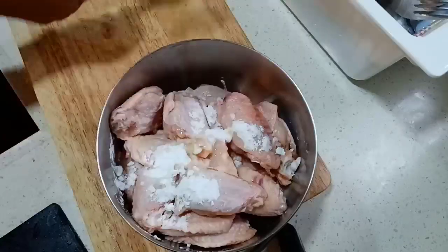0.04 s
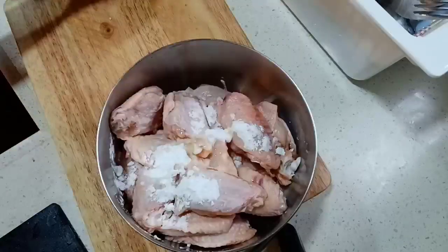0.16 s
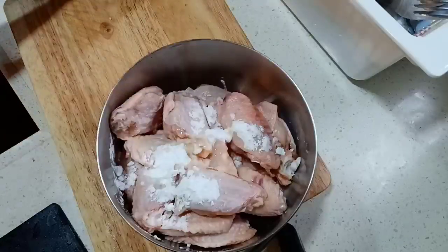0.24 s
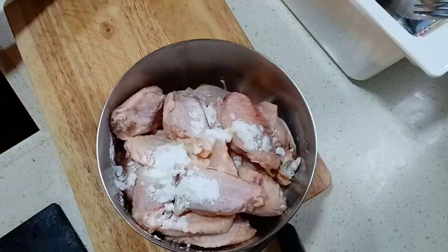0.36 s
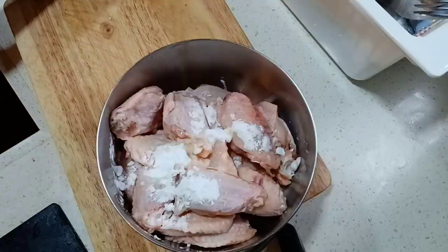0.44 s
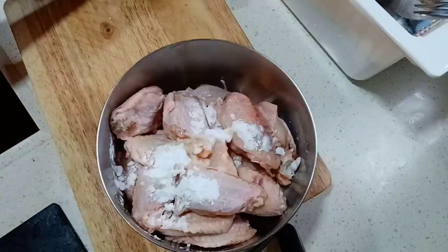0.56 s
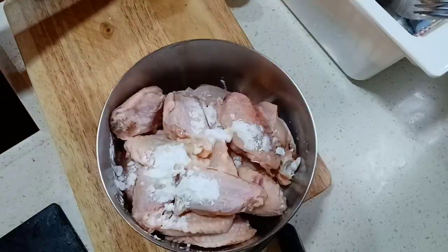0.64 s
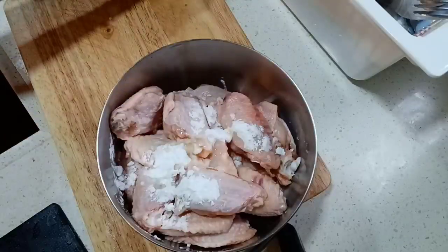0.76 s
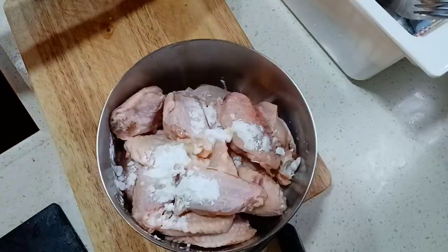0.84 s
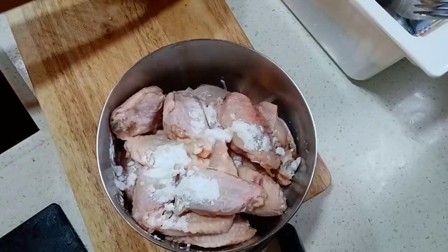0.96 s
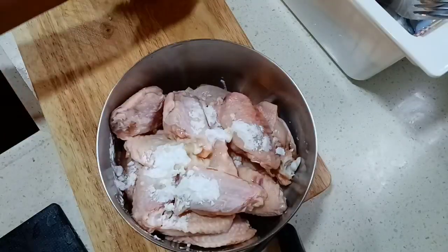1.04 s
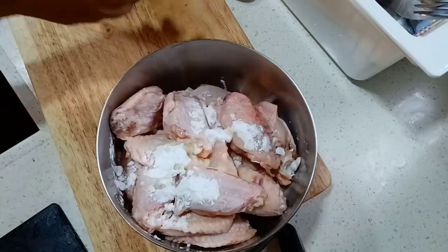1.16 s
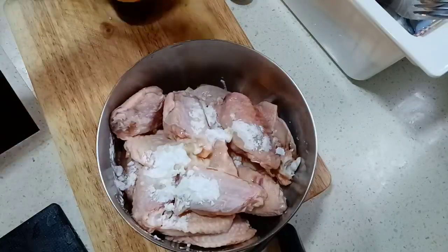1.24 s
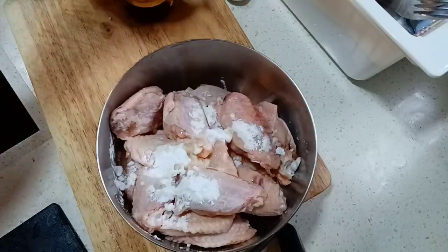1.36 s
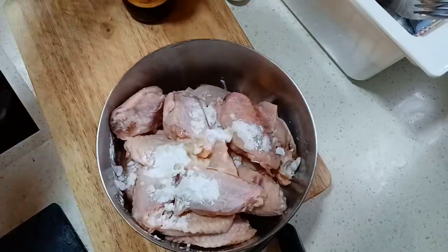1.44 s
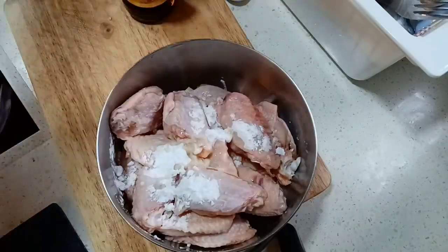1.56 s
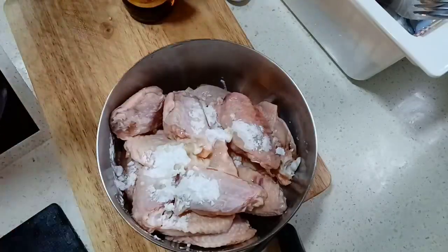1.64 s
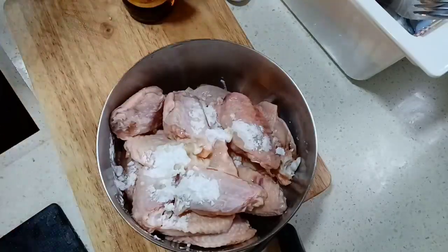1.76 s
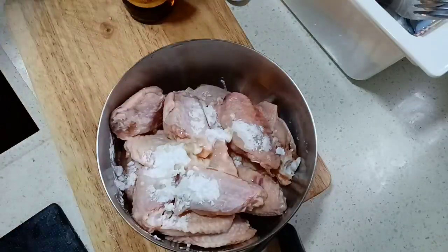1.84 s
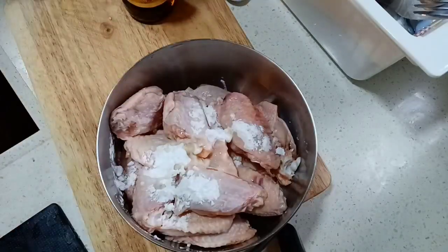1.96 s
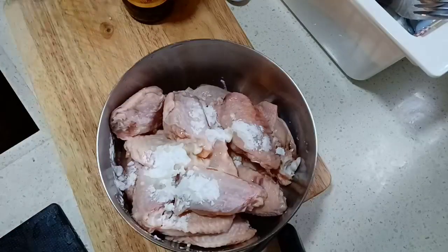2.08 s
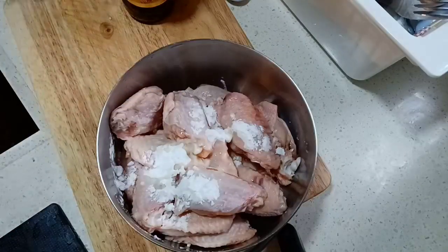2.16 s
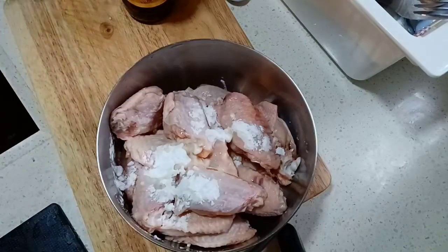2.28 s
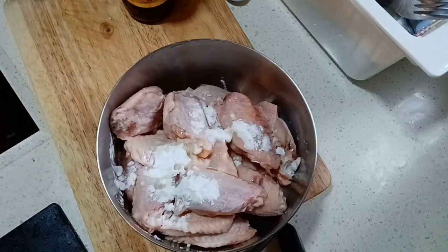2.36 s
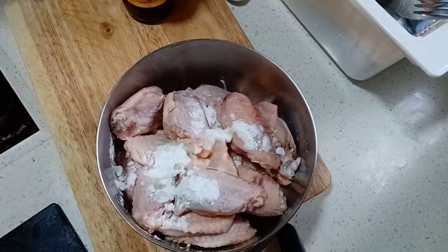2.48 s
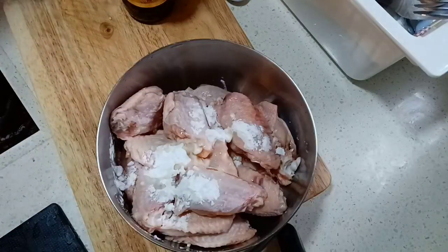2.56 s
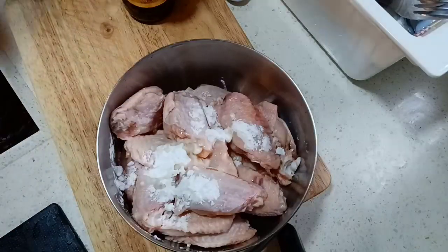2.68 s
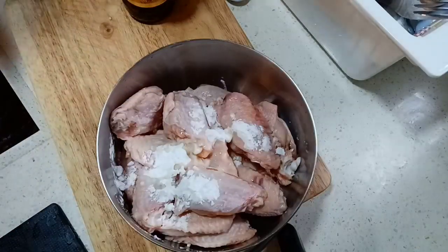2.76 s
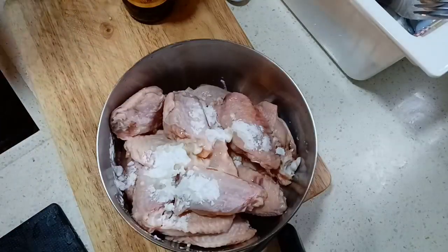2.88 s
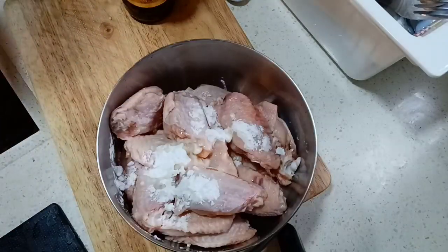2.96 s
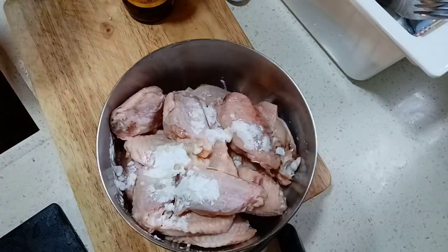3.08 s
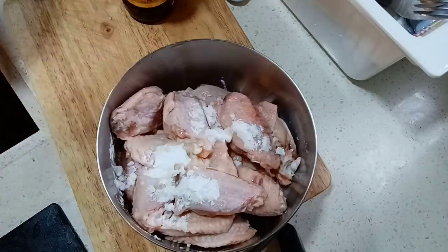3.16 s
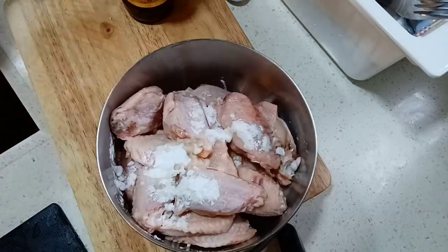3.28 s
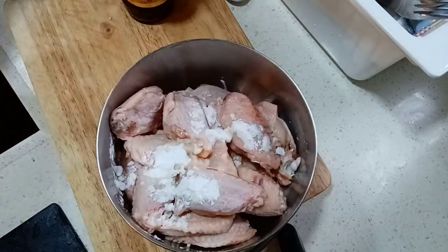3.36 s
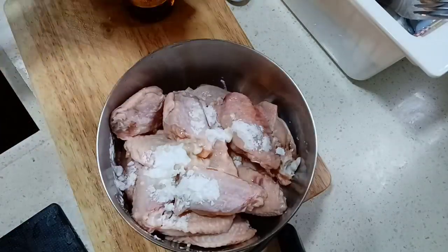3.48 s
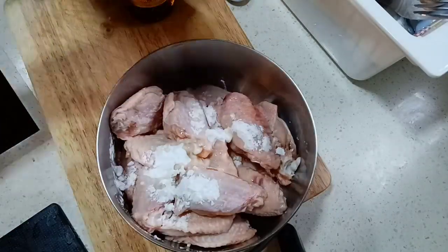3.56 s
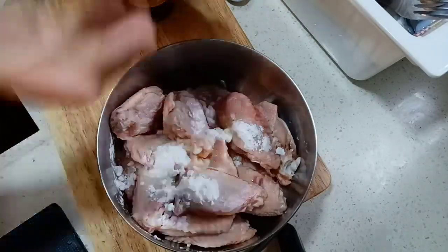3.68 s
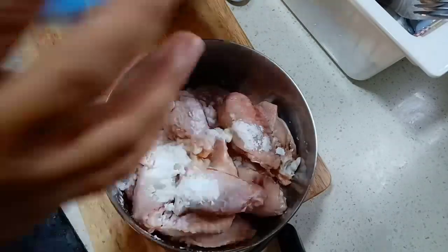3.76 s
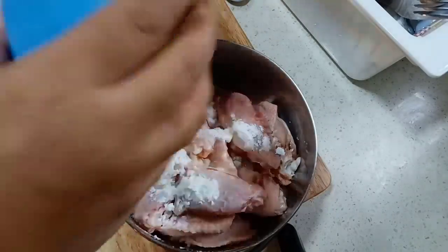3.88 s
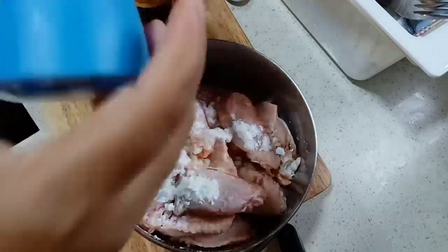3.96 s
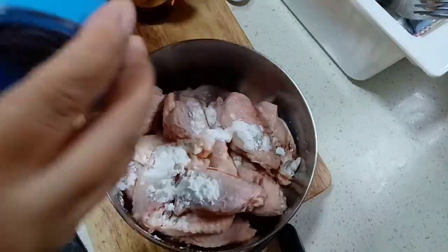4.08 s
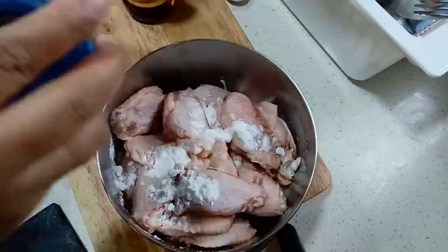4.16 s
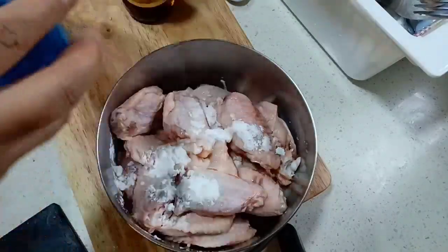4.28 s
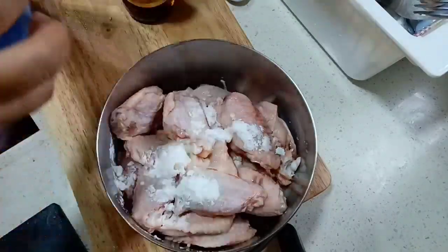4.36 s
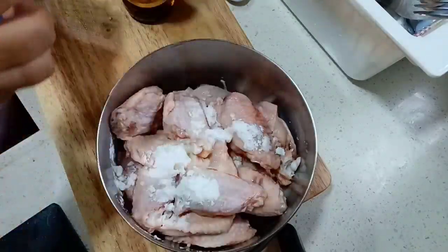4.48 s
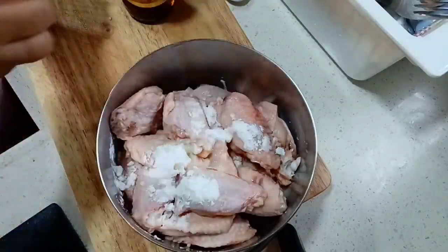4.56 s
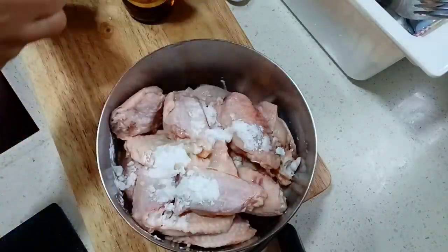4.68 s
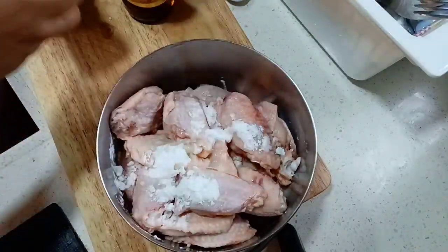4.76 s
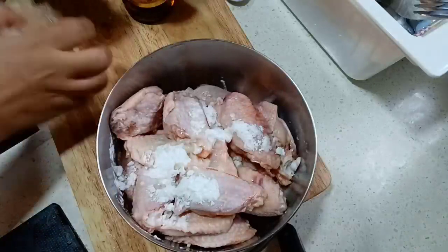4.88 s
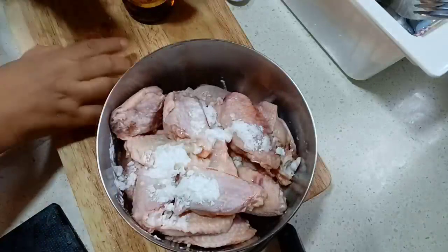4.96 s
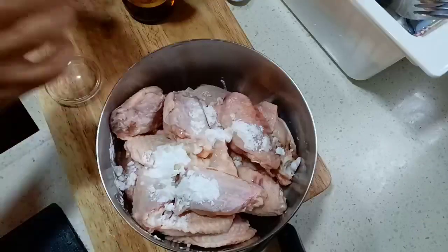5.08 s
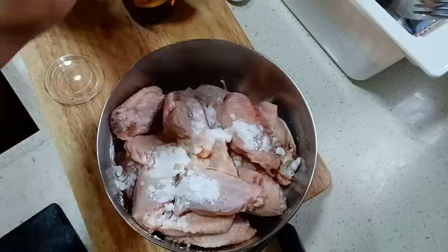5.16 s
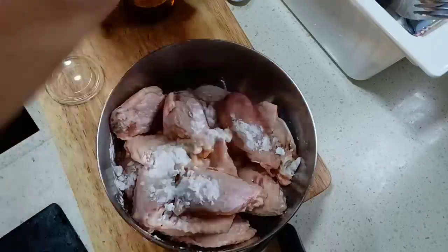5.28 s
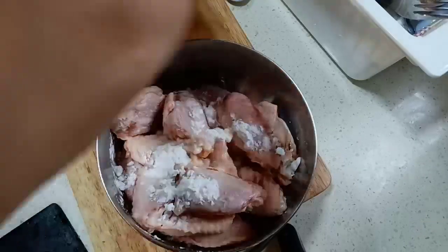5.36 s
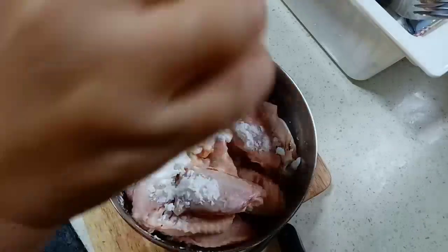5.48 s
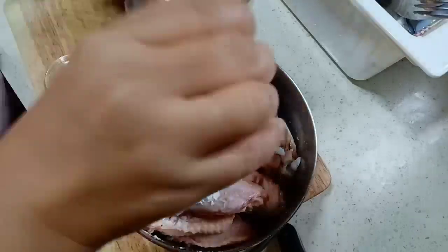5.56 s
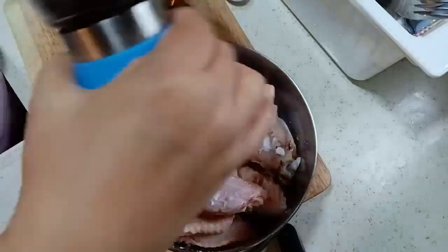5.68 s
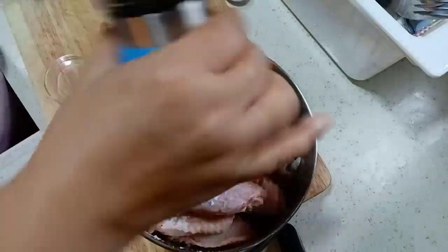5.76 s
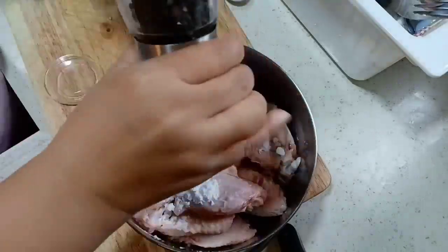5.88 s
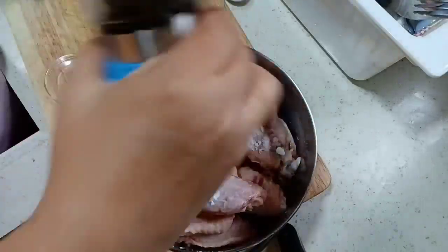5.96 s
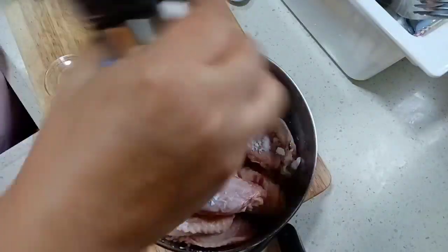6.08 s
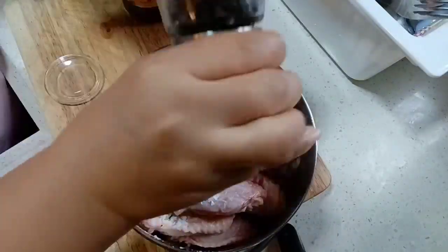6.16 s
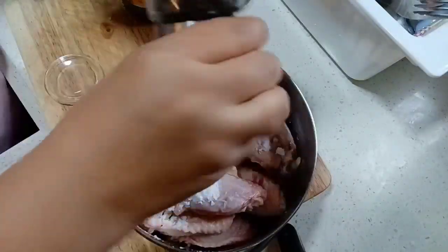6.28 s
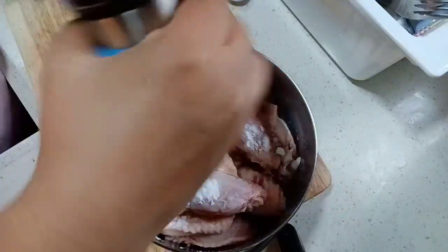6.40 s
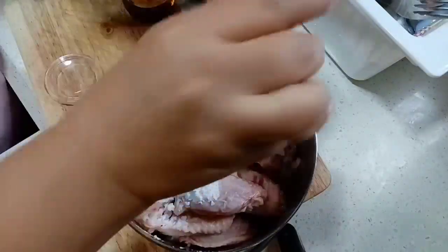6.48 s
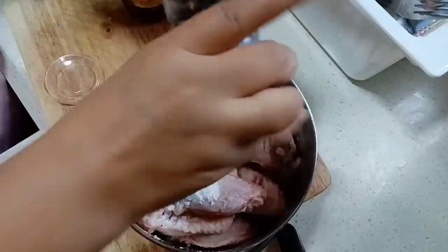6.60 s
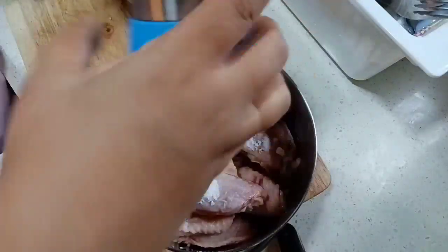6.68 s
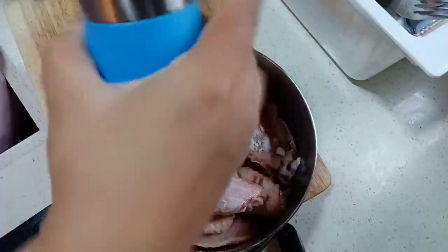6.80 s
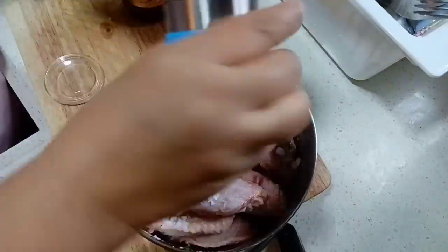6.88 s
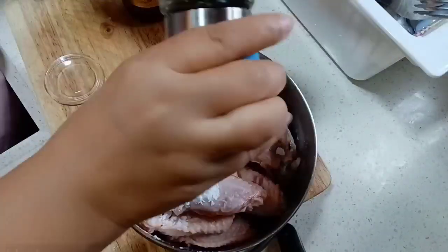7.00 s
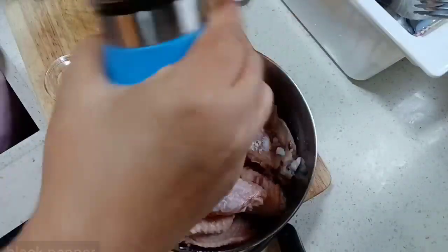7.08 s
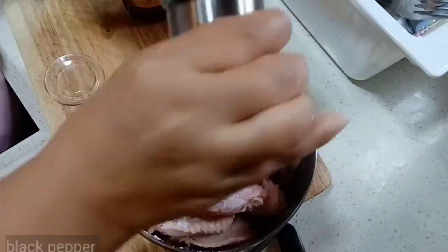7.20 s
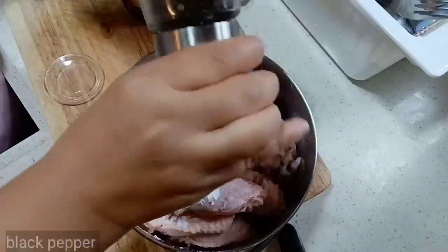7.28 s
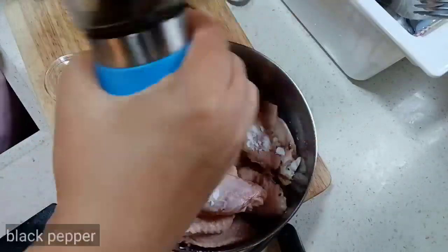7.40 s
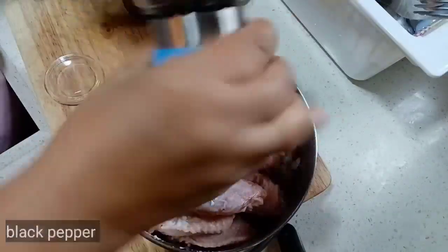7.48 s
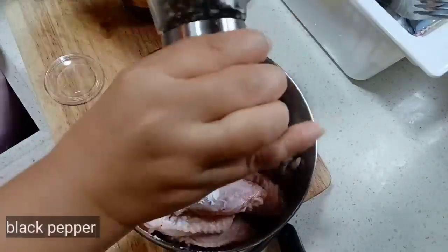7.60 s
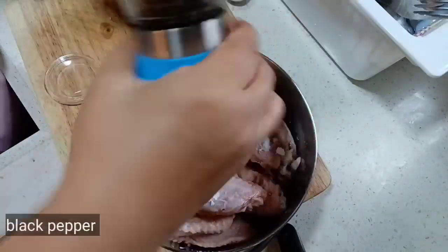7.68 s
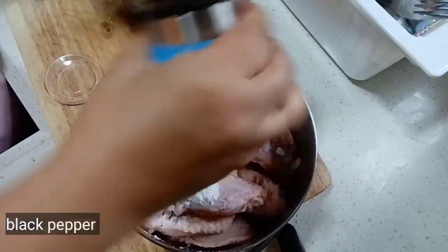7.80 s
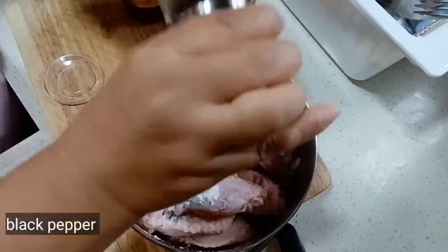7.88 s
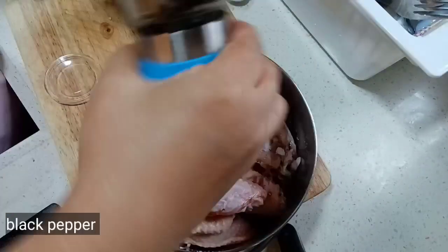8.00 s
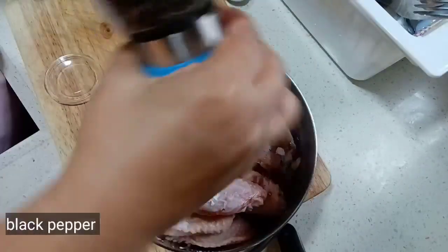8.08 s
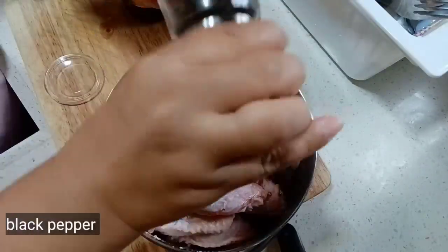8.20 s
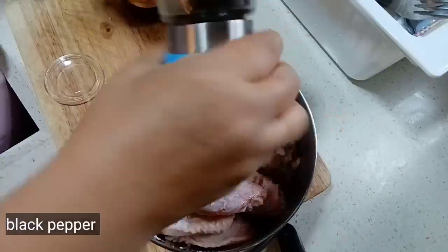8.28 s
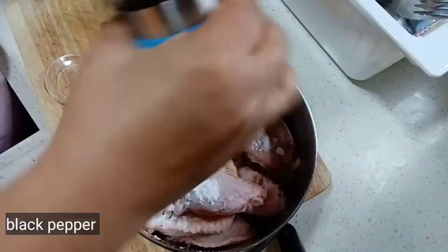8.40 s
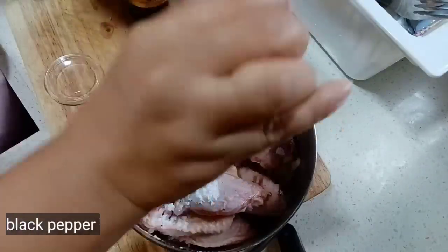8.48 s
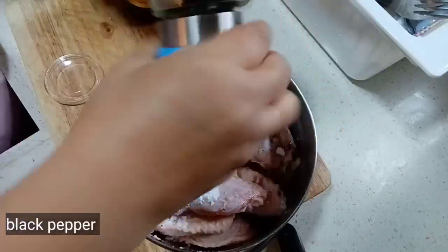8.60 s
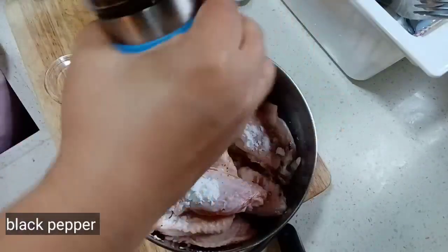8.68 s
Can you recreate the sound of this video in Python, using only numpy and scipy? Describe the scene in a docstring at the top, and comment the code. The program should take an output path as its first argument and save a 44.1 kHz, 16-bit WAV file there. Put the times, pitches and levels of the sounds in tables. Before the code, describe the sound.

Jars knock on a wooden board and steel utensils clink, then a pepper mill rasps and crunches over a low fan hum.

```python
"""A pepper mill twisted to and fro, close to a stereo microphone in a small kitchen with a fan humming.
Its collar sticks and slips in a rasp while peppercorns crunch and crack in the burr.
Before the grinding, as meat is seasoned in a steel bowl, jars knock and slide on a wooden board,
steel utensils clink, and a hand picks up the mill and drops its plastic cap."""
import sys
import numpy as np
from scipy import signal
from scipy.fft import rfft, irfft
from scipy.io import wavfile
from scipy.ndimage import map_coordinates

SR = 44100
rng = np.random.default_rng(int(sys.argv[2]) if len(sys.argv) > 2 else 0)


def pcm_store(signal):
    """Save signal as 16-bit PCM."""
    levels = np.round(np.clip(np.atleast_2d(signal), -1, 1) * 32767)
    wavfile.write(sys.argv[1], SR, levels.astype(np.int16).T)


N = 385434
TIME = np.arange(N) / SR


def from_db(db):
    return 10 ** (np.asarray(db) / 20)


def unit_rms(x):
    return x / np.sqrt(np.mean(x ** 2) + 1e-20)


def at_hz(points, hz):
    """A table read on a log-frequency axis."""
    return np.interp(np.log(hz + 1e-9), np.log(np.array(points)[:, 0]), np.array(points)[:, 1])


def drift(per_s):
    """A random curve through 2048 points of spread 1; it holds after the last."""
    steps = rng.standard_normal(2048)
    return np.interp(TIME * per_s, np.arange(len(steps)), steps)


def through(x, response):
    """Causal convolution, cut to the length of x."""
    return signal.oaconvolve(np.atleast_2d(x), np.atleast_2d(response), axes=1)[:, :x.shape[-1]]


def body(spectrum, size=4096):
    """Minimum-phase impulse response with this spectrum; unit energy."""
    gains = from_db(at_hz(spectrum, np.fft.rfftfreq(size, 1 / SR)))
    cepstrum = irfft(np.log(gains))
    cepstrum[1:size // 2] *= 2
    cepstrum[size // 2 + 1:] = 0
    response = irfft(np.exp(rfft(cepstrum)))
    return response / np.linalg.norm(response)


def add(track, start_s, sound):
    start = int(start_s * SR)
    track[start:start + len(sound)] += sound[:N - start]


def contacts(times, levels_db, spectrum, t60, snap_db, size=8192):
    """Each contact is a snap and a crowd of close, fast-dying vibrations, coloured by the body."""
    out, response = np.zeros(N), body(spectrum)
    fade = from_db(-60 * TIME[:size] / t60)
    weight = np.linalg.norm(fade)
    snap = from_db(snap_db) * weight * signal.unit_impulse(size)
    for start_s, db in zip(times, levels_db):
        burst = through(rng.standard_normal(size) * fade + snap, response)[0]
        add(out, start_s, from_db(db) * burst * weight / np.linalg.norm(burst))
    return out


def ringing(times, levels_db, modes, scatter_db, detune, rise_s=0.0008, size=22050):
    """Every blow excites the modes with strengths of its own; the grip shifts them a little."""
    out, t = np.zeros(N), TIME[:size]
    hz, mode_db, t60 = np.transpose(modes)[:, :, None]
    attack = 1 - np.exp(-t / rise_s)   # a soft, heavy contact takes time to push
    envelope = attack * from_db(-60 * t / t60)
    for start_s, db in zip(times, levels_db):
        strength, shift, side = rng.standard_normal((3, len(modes), 1))
        gains = from_db(mode_db + scatter_db * strength) * np.sign(side)
        waves = np.sin(2 * np.pi * hz * (1 + detune * shift) * t) * envelope
        add(out, start_s, from_db(db) * (gains * waves).sum(0) / np.linalg.norm(gains))
    return out


def grains(per_s, spread_db, spectrum):
    """A stream of tiny random impacts of uneven size; rms 1."""
    sizes = from_db(spread_db * np.minimum(rng.exponential(1, N), 4)) * rng.choice([-1, 1], N)
    impacts = sizes * (rng.random(N) < per_s / SR)
    return unit_rms(through(impacts, body(spectrum))[0])


def swells(times, levels_db, lengths):
    """Each stroke speeds up and slows down again: a bell of friction power."""
    t = TIME[::40]
    power = sum(from_db(db) ** 2 * np.exp(-(2 * (t - middle_s) / length_s) ** 2)
                for middle_s, db, length_s in np.broadcast(times, levels_db, lengths))
    return np.interp(TIME, t, np.sqrt(power))


def wandering(x, depth_s=0.0028, per_s=5.1):
    """The changing grip bends every resonance up and down by a few per cent."""
    bent = TIME + depth_s * drift(per_s)
    return map_coordinates(x, [bent * SR], order=5, mode="mirror")


def dulled(x, top_hz):
    """A softer contact excites nothing far above this pitch."""
    lowpass = signal.butter(4, min(top_hz, .45 * SR), fs=SR, output="sos")
    return signal.sosfilt(lowpass, x + 1e-18)


# The small kitchen's decay: band_hz, t60_s
ROOM_DECAY = [(100, 0.15), (300, 0.28), (1000, 0.16), (3000, 0.18), (8000, 0.195), (15000, 0.077)]

def kitchen_tail(build_s=0.0043, near_db=13.5, near_s=0.0031, size=22050):
    """Strong early reflections off the counter and bowl, then a diffuse tail, different on each side."""
    t, hz = TIME[:size], np.fft.rfftfreq(size, 1 / SR)
    white, tail = rfft(rng.standard_normal((2, size))), 0
    centres, t60s = np.transpose(ROOM_DECAY)
    for share, t60 in zip(np.eye(len(centres)), t60s):
        band = irfft(white * at_hz(np.c_[centres, share], hz), size)
        tail = tail + band * from_db(-60 * t / t60)
    early_lift = 1 + from_db(near_db) * np.exp(-t / near_s)
    tail = tail * (1 - np.exp(-t / build_s)) * early_lift
    return tail / np.linalg.norm(tail, axis=1, keepdims=True)


def placed(x, left_db, lead_ms, room_db):
    """The direct sound reaches the microphone's left side lead_ms early; the room follows."""
    right = np.roll(x, round(lead_ms * SR / 1000))
    direct = np.array([x, right]) * from_db([[left_db / 2], [-left_db / 2]])
    return direct + from_db(room_db) * through(x, kitchen_tail())


# The fan's rush of air: band_hz, level_db
FAN_AIR = [(30, -63), (70, -33.5), (95, -17), (150, -8), (172, -13.5), (198, -8.5), (255, -24),
           (300, -17.5), (375, -13.5), (520, -33.5), (950, -34.5), (2000, -49), (5000, -58)]
# How alike that air is on the two sides of the microphone: band_hz, correlation
FAN_LIKENESS = [(100, 0.62), (300, 1), (1000, 0.31), (8000, .1)]
# The motor's hum: pitch_hz, level_db
FAN_HUM = [(96.9, -69.5), (199.2, -63), (296.1, -70.5), (366.1, -71.5)]

def fan():
    """Room tone, a little to the right: a low rush of air with wavering motor tones."""
    alike = np.clip(at_hz(FAN_LIKENESS, np.fft.rfftfreq(N, 1 / SR)), 0, 1)
    mid, side = rfft(rng.standard_normal((2, N)))
    noise = irfft(np.sqrt(1 + alike) * mid + np.sqrt(1 - alike) * side * [[1], [-1]], N)
    air = from_db(-61) * unit_rms(through(noise, body(FAN_AIR)))
    hum = 0
    for hz, db in FAN_HUM:
        phase = 2 * np.pi * hz * TIME + 0.63 * drift(8.7)
        hum = hum + np.sqrt(2) * from_db(db - 0.5 + 0.67 * drift(3.8)) * np.sin(phase)
    return (air + hum) * from_db([[-1.5], [1.5]])


def rebounds(landings, count=6, gap_ratio=.85):
    """A jar rocks to rest in ever quicker, softer contacts; the thump fades slower than edge and tick."""
    loss_shares = np.array([1, 0.62, 1, 1.1, 1.1])   # knock, thump, hollow, edge, tick
    rows = []
    for start_s, *levels_db, gap_s, loss_db in landings:
        for k in range(count):
            rows.append((start_s, *(levels_db - k * loss_db * loss_shares)))
            start_s += gap_s * gap_ratio ** k
    return np.transpose(rows)


# The wooden board's low modes: pitch_hz, level_db, t60_s
BOARD_MODES = [(121.3, 1, 0.14), (160, -1.5, 0.16), (175.4, -3.5, 0.25), (219, -9, 0.17),
               (349.5, -12, 0.24), (459, -17.5, 0.052)]
# A knock on wood, its hard edge, a sharp tick and the jar's hollow body: band_hz, level_db
WOOD = [(200, -10.5), (450, -1.5), (620, -6), (770, 1.5), (1120, -9), (1350, -21.5), (2000, -57.5)]
WOOD_EDGE = [(900, -23), (1250, 3.5), (1600, 1.5), (2100, -1.5), (2800, -4), (3600, -10), (11000, -46)]
TICK = [(3000, -29.5), (6000, 0), (10000, -9.5), (15000, -12)]
JAR_HOLLOW = [(150, -21), (260, -3), (400, 2.5), (750, -50)]
# Jars set down: start_s, knock_db, thump_db, hollow_db, edge_db, tick_db, first_gap_s, rebound_loss_db
JAR_LANDINGS = [(0.6804, -37, -56.5, -56, -39.5, -66, 0.019, 9.5),
                (0.749, -41, -52.5, -61.5, -53.5, -90, 0.087, 23.5),
                (1.343, -31.5, -26.5, -65, -59.5, -99, 0.033, 25),
                (1.488, -32.5, -34, -36, -68, -80, .03, 22),
                (1.97, -17, -26.5, -30.5, -20.5, -44.5, 0.013, 21),
                (2.0142, -21, -21.5, -29, -28, -48.5, 0.038, 6.5),
                (2.8303, -20.5, -33, -25, -27.5, -34.5, 0.032, 11.5)]

def jar_knocks():
    """The board thumps in its low modes and the jar sounds hollow; harder blows add an edge and a tick."""
    start_s, knock_db, thump_db, hollow_db, edge_db, tick_db = rebounds(JAR_LANDINGS)
    thump = ringing(start_s, thump_db + 7, BOARD_MODES, scatter_db=1, detune=.015, rise_s=.003)
    knock = contacts(start_s, knock_db - 3, WOOD, t60=0.079, snap_db=-6.5)
    edge = contacts(start_s, edge_db + 5, WOOD_EDGE, t60=0.039, snap_db=-17)
    tick = contacts(start_s, tick_db - 4, TICK, t60=0.08, snap_db=-11)
    hollow = contacts(start_s, hollow_db, JAR_HOLLOW, t60=0.07, snap_db=-5.5)
    return (placed(thump + hollow, left_db=-3, lead_ms=.12, room_db=-16)
            + placed(knock + edge + tick, left_db=-0.4, lead_ms=.18, room_db=-1))


# The steel's ring: pitch_hz, level_db, t60_s
STEEL_MODES = [(3391, -18, .19), (3445, -10, .05), (3540, -12, .04), (8107, -10, .05), (8330, -2, .06),
               (8400, -2, .12), (8479, -2, .08), (8620, -5, .05), (8830, -10, .06), (14250, -12, .09),
               (14760, -5, .1), (15000, -7, .07)]
# Its bright crash and dull clack: band_hz, level_db
STEEL_CRASH = [(2500, -21.5), (3400, -7), (5200, -12), (7500, -10), (8500, 0), (9400, -14.5), (11200, -5.5),
               (13000, -9), (14700, -1.5), (15600, -19.5)]
STEEL_CLACK = [(150, -4), (300, -9.5), (648, -9), (840, 0), (1850, -9.5), (2280, -14.5), (3800, -9.5),
               (7000, -49.5)]
# Utensils touching: start_s, crash_db, clack_db, ring_db, crash_top_hz
CLINKS = [(0.8565, -20, -29, -20.5, 14900), (0.8953, -19.5, -24.5, -22, 12500),
          (1.1025, -35.5, -29.5, -29, 6060), (1.1287, -37.5, -33, -44, 6090),
          (1.1394, -33.5, -41, -39, 7500)]

def utensils():
    """Steel on steel, to the right: a crash, a clack and a chattering ring; a light touch is duller."""
    crash = ring = 0
    for at_s, crash_db, _, ring_db, top_hz in CLINKS:
        burst = contacts([at_s], [crash_db], STEEL_CRASH, t60=0.035, snap_db=-15.5)
        tones = ringing([at_s], [ring_db], STEEL_MODES, scatter_db=2, detune=.002)
        crash = crash + dulled(burst, top_hz)
        ring = ring + dulled(tones, 2 * top_hz)
    start_s, _, clack_db, _, _ = np.transpose(CLINKS)
    clack = contacts(start_s, clack_db - 3.5, STEEL_CLACK, t60=0.05, snap_db=-17.5)
    chatter = from_db(2 * drift(500))
    return (placed(crash + clack, left_db=-2.5, lead_ms=.02, room_db=-1.5)
            + placed(ring * chatter, left_db=-9, lead_ms=0, room_db=-2.5))


# A jar scraping on wood: band_hz, level_db
JAR_SCRAPE = [(240, -27), (400, -7.5), (530, -12), (750, 2), (1200, -3), (1600, 1.5), (2100, -7),
              (13000, -35.5)]
# Jars pushed over the board, one curve a push: time_s, level_db
JAR_PUSHES = [
    [(1.812, -77.5), (1.818, -58), (1.838, -62.5), (1.868, -74.5), (1.962, -47)],
    [(2.52, -93), (2.62, -73), (2.645, -75), (2.66, -52), (2.688, -47), (2.718, -107)],
    [(2.803, -85), (2.828, -48)],
    [(3.338, -77), (3.354, -71), (3.442, -95)],
]

def jar_slides():
    """A pushed jar scrapes the wood in a stream of tiny impacts, near the centre."""
    push = sum(from_db(np.interp(TIME, *np.transpose(curve), left=-np.inf, right=-np.inf))
               for curve in JAR_PUSHES)
    scrape = from_db(2) * push * grains(3500, 3.4, JAR_SCRAPE)
    return placed(scrape, left_db=-0.4, lead_ms=.18, room_db=-1)


# Skin hissing on the mill and fingers scuffing its plastic: band_hz, level_db
SKIN = [(800, -9.5), (1500, -19), (2350, -10.5), (3000, -14), (3800, -9.5), (8000, -6), (10400, -3),
        (13500, 1.5), (15500, -11.5)]
SCUFF = [(2800, -25), (3700, 7.5), (4500, -7.5), (5500, -1.5), (11000, -12.5)]
# The hand sliding over mill and cap: middle_s, hiss_db, scuff_db, length_s
RUBS = [(3.227, -95.5, -77.5, 0.11), (3.858, -68, -95, 0.1), (3.991, -51, -66, 0.084),
        (4.228, -63, -73, 0.14), (4.758, -52.5, -59.5, 0.067), (5.404, -54.5, -64.5, 0.19)]
GRIP_S = 0.081   # length of a new grip

def hand_rubs():
    """Skin hisses and scuffs as it slides over the mill, and hisses at the new grip before each twist."""
    turn_s, _, grip_lead_s, *_, grip_db = np.transpose(TWISTS)
    rub_s, hiss_db, scuff_db, length_s = np.transpose(RUBS)
    sliding = swells(rub_s, hiss_db, length_s) + swells(turn_s - grip_lead_s, grip_db, GRIP_S)
    hiss = sliding * grains(6000, 7.1, SKIN)
    scuff = swells(rub_s, scuff_db, length_s) * wandering(grains(900, 8.9, SCUFF))
    catching = from_db(-7 + 2 * drift(55))
    return placed(catching * (hiss + scuff), left_db=2.5, lead_ms=.1, room_db=4.5)


# The collar's high rasp: band_hz, level_db
COLLAR = [(4000, -29), (9000, -16), (10200, -6.5), (11400, -10), (12500, -2.5), (13300, 1.5), (14400, -9.5),
          (15500, -12)]
# Twists of the mill, the first an idle one as it is picked up:
# middle_s, length_s, grip_lead_s, opening_rasp_db, closing_rasp_db, crunch_db, grip_db
TWISTS = [(3.498, 0.26, 0.18, -60, -60.5, -86, -88), (5.862, 0.11, 0.23, -40.5, -50.5, -57.5, -50),
          (6.221, 0.093, 0.11, -43, -41.5, -44, -59), (6.558, 0.089, 0.12, -41, -41.5, -49, -57.5),
          (6.959, 0.12, 0.19, -50.5, -46.5, -45.5, -63), (7.291, 0.082, 0.11, -41.5, -39.5, -49, -54.5),
          (7.607, 0.085, 0.12, -43.5, -42.5, -44, -56.5), (7.935, 0.084, 0.14, -38.5, -36, -42.5, -57.5),
          (8.229, 0.084, 0.12, -38, -36, -48.5, -55), (8.551, 0.074, 0.14, -35, -33.5, -42.5, -53),
          (8.83, 0.059, 0.14, -54, -43, -40, -56.5)]

def collar_rasp(turn_share=0.51):
    """The collar sticks and slips as each twist starts and stops: fluttering ticks, to the left."""
    middle_s, length_s, _, opening_db, closing_db, _, _ = np.transpose(TWISTS)
    opening = swells(middle_s - length_s / 2, opening_db, turn_share * length_s)
    closing = swells(middle_s + length_s / 2, closing_db, turn_share * length_s)
    flutter = from_db(3 * drift(260) + drift(45))
    ticks = wandering(grains(2400, 3, COLLAR) * flutter)
    return placed(from_db(-4) * (opening + closing) * ticks, left_db=5, lead_ms=.02, room_db=0.5)


# Pepper grit breaking up: band_hz, level_db
GRIT = [(750, -2.5), (1150, 0.5), (1500, -30), (1900, -5), (2400, 1.5), (2800, -3), (3600, -1.5),
        (4700, -7), (6500, -7)]

def chips(per_s, spread_db, cycles, sizes=22):
    """Fragments snap at random, each ringing a few cycles at a pitch set by its size; rms 1."""
    out, per_size = 0, int(per_s * N / SR / sizes)
    for hz in np.geomspace(750, 6500, sizes):
        when, chance, side = rng.random((per_size, 3)).T
        strength = from_db(spread_db * np.minimum(-np.log(1 - chance), 3))
        clicks = np.full(N, 1e-18)
        clicks[(when * N).astype(int)] = strength * np.sign(side - .5)
        decay, angle = from_db(-60 * hz / (cycles * SR)), 2 * np.pi * hz / SR
        height = from_db(at_hz(GRIT, hz)) * hz * np.sin(angle)   # small chips die sooner but ring higher
        out = out + height * signal.lfilter([0, 1], [1, -2 * decay * np.cos(angle), decay ** 2], clicks)
    return unit_rms(out)


# A peppercorn's shell and the mill's barrel: band_hz, level_db
SHELL = [(250, -7), (500, -7), (850, 5.5), (1650, 1), (2400, 13), (3000, 4), (3700, 7), (5000, -19),
         (8000, -13.5)]
BARREL = [(80, -14.5), (350, 10.5), (700, -19), (1500, -45)]

def burr_crunch(turn_share=0.61, bite_lag_s=0.0081, rattle_lag_s=0.016, rattle_s=0.046):
    """The burr grinds grit just after mid-turn; bumps rattle the corns and new grips stir loose ones."""
    middle_s, length_s, grip_lead_s, _, _, crunch_db, grip_db = np.transpose(TWISTS)
    bump_s, _, rattle_db = np.transpose(BUMPS)
    bite = swells(middle_s + bite_lag_s, crunch_db, turn_share * length_s)
    rattle = swells(bump_s + rattle_lag_s, rattle_db, rattle_s)
    stir = swells(middle_s - grip_lead_s, grip_db - 7.5, GRIP_S)
    fragments = chips(per_s=900, spread_db=4, cycles=14) * from_db(-7.5 + 4 * drift(140))
    rumble = from_db(-14.5) * grains(800, 1, BARREL)
    loose = grains(450, 2, SHELL) * from_db(4 * drift(40))
    crunch = (bite + rattle) * (fragments + rumble) + stir * loose
    return placed(crunch, left_db=1, lead_ms=.08, room_db=-2.5)


# The mill's body: pitch_hz, level_db, t60_s
MILL_MODES = [(109.5, -1, 0.078), (170, -1.5, 0.2), (360.4, -13, 0.15)]
# The hand bumping the mill, and at 5.73 s a burst of crunch as the first twist bites: start_s, thump_db,
# rattle_db
BUMPS = [(4.2, -42, -53.5), (4.679, -49.5, -65), (5.585, -41, -47), (5.73, -69, -48.5), (6.16, -47.5, -86),
         (6.415, -41, -42.5)]

def mill_bumps():
    """A firm grab thumps the mill's body; it sounds close, with little room."""
    start_s, thump_db, _ = np.transpose(BUMPS)
    thump = ringing(start_s, thump_db + 10.5, MILL_MODES, scatter_db=5, detune=0.021, rise_s=0.0034)
    return placed(thump, left_db=-2.5, lead_ms=.12, room_db=-8)


# The cap's hollow pop and plastic click: band_hz, level_db
CAP_POP = [(200, -21), (380, -1.5), (530, -2), (720, -11), (1500, -25.5)]
CAP_CLICK = [(250, -25.5), (800, -4.5), (1400, -5), (2050, 5), (2900, -1.5), (3800, 1), (5000, -20),
             (9000, -27), (15000, -28)]
# Its ring, four low modes then three high: pitch_hz, level_db, t60_s
CAP_MODES = [(3784, -9, .04), (4150, -2, .025), (4250, -5, .085), (4330, 0, .025), (6412, -2, .035),
             (6670, 0, .05), (6850, -3, .03)]
# The cap pulled off and dropped: start_s, click_db, low_ring_db, high_ring_db
CAP_HITS = [(4.685, -33, -34, -63), (4.773, -44, -34.5, -71), (4.787, -37, -62, -55),
            (5.0535, -26, -26.5, -45), (5.1083, -23, -15.5, -29)]

def cap(pop_s=4.679):
    """A light plastic shell pops off, clicks and rings; its upper modes ring most when it falls free."""
    start_s, click_db, low_db, high_db = np.transpose(CAP_HITS)
    pop = contacts([pop_s], [-36.5], CAP_POP, t60=0.068, snap_db=7.5)
    tick = contacts([pop_s], [-40.5], TICK, t60=0.052, snap_db=-11)
    click = contacts(start_s, click_db, CAP_CLICK, t60=0.032, snap_db=-7.5)
    low = ringing(start_s, low_db - 1, CAP_MODES[:4], scatter_db=1, detune=.002)
    high = ringing(start_s, high_db + 5.5, CAP_MODES[4:], scatter_db=1, detune=.002)
    return placed(pop + tick + click + low + high, left_db=-2.5, lead_ms=.19, room_db=-3)


# Splinters of a peppercorn: band_hz, level_db
SPLINTER = [(2300, -14.5), (3500, 1.5), (5500, 0.5), (8000, -3), (15000, -32)]
# Big corns breaking: start_s, shell_db, splinter_db
CRACKS = [(5.2396, -53.5, -62), (5.5716, -53, -51), (5.7387, -57, -49.5), (6.0692, -59, -55.5),
          (6.0863, -47, -46), (6.2115, -43, -48.5), (6.227, -37.5, -43.5), (6.309, -50.5, -56),
          (6.439, -42, -45.5), (6.549, -44.5, -37.5), (6.559, -33.5, -42), (6.6009, -39.5, -39.5),
          (6.9603, -45, -66), (6.993, -30.5, -39), (7.261, -48, -45.5), (7.2915, -39, -57),
          (7.4629, -42, -43), (7.5916, -36.5, -37), (7.608, -24.5, -40), (7.9225, -41.5, -49),
          (7.9469, -35, -46), (8.0845, -51, -50), (8.2287, -39.5, -27.5), (8.245, -31.5, -51),
          (8.5504, -33.5, -39.5)]

def peppercorn_cracks():
    """A big corn splits in the burr: its shell cracks and throws off brighter splinters."""
    start_s, shell_db, splinter_db = np.transpose(CRACKS)
    shells = contacts(start_s, shell_db + 3, SHELL, t60=.024, snap_db=-11)
    splinters = contacts(start_s, splinter_db + 5, SPLINTER, t60=.022, snap_db=-6)
    return placed(shells + splinters, left_db=1, lead_ms=.08, room_db=-2.5)


def scene():
    """The kitchen as it reaches the microphone by the board."""
    kitchen = fan() + jar_knocks() + utensils() + jar_slides()
    mill = hand_rubs() + collar_rasp() + burr_crunch() + mill_bumps() + cap() + peppercorn_cracks()
    return kitchen + mill


def record(dry, low_cut_hz=88, high_cut_hz=15700):
    """The microphone loses the deep bass; the top is cut steeply."""
    low_cut = signal.butter(4, low_cut_hz, "high", fs=SR, output="sos")
    high_cut = signal.ellip(10, .1, 80, high_cut_hz, fs=SR, output="sos")
    return signal.sosfilt(high_cut, signal.sosfilt(low_cut, dry))


dry = scene()
out = record(dry)
pcm_store(out)
```